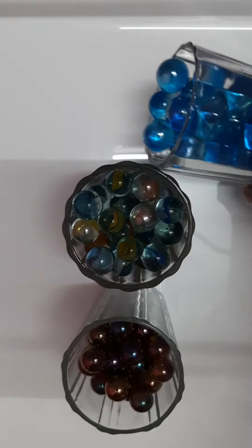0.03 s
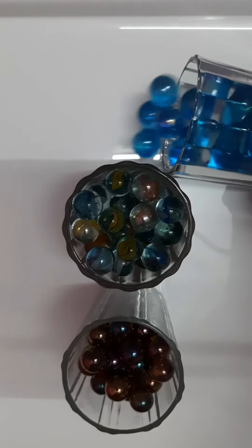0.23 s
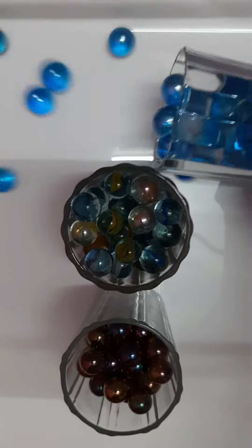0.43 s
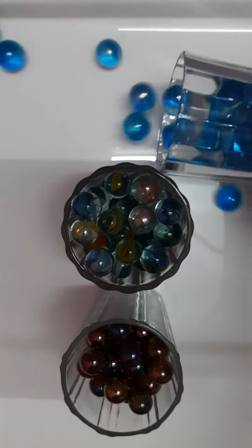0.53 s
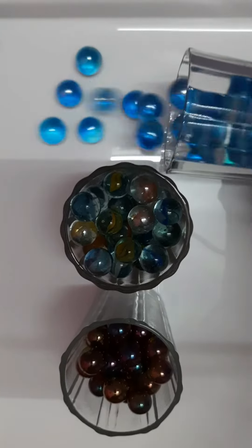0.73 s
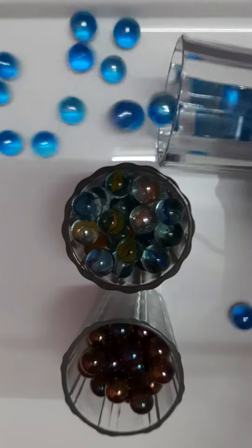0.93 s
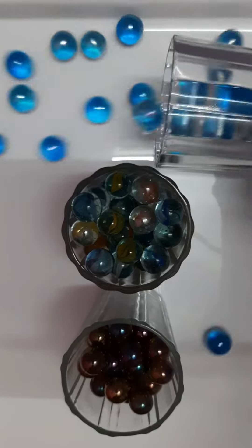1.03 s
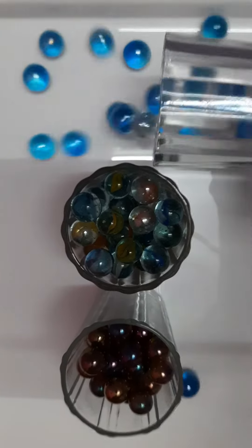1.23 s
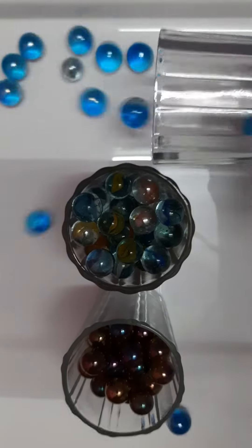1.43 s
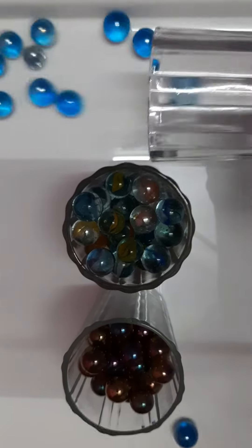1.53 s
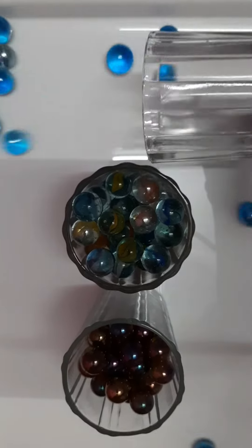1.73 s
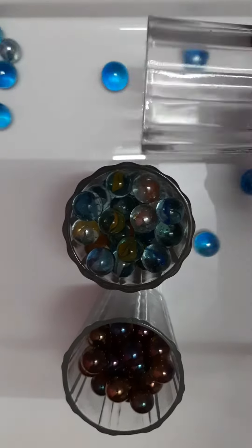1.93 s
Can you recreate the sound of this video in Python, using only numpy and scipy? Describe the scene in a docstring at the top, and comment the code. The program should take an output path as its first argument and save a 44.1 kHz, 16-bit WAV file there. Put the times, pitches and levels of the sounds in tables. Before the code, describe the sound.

Glass marbles pour from a tilted drinking glass onto a hard table. They clink against the glass, land in a quick run of clacks, then roll with a low rumble as the hits thin out. Heard close in a small room.

```python
"""A low rumble and a soft knock, then glass marbles pour from a tilted drinking glass onto a hard table.
Heard close, in a small room, they tick against each other, clink on the glass, bounce and roll away.
The glass rings briefly, damped by the marbles still inside, and bumps down once as the load shifts.
Each landing clacks and sets the table top drumming; rolling over tiny bumps makes it rumble."""
import sys
import numpy as np
from scipy import signal
from scipy.fft import rfft, irfft
from scipy.io import wavfile

SR = 44100
rng = np.random.default_rng(int(sys.argv[2]) if len(sys.argv) > 2 else 0)


def transcribe(signal):
    """Save signal, clipped to [-1, 1], as a 16-bit WAV file at the path in sys.argv[1]."""
    frames = np.atleast_2d(signal).T
    limited = np.clip(frames, -1, 1)
    pcm = np.round(limited * 32767).astype(np.int16)
    wavfile.write(sys.argv[1], SR, pcm)


N = 88200

# Rumble of rolling marbles. Each row: time in seconds, level in dB.
ROLL_ENVELOPE = [(0,-30.5),(0.059,-44.5),(.14,-54),(0.262,-45.5),(0.299,-21),(.4,-41),(.49,-45),(0.602,-27),(.7,-38),(.9,-25),(1.3,-35),(1.55,-28.5),(1.64,-39.5),(1.83,-44.5),(1.93,-54),(2,-38.5)]
# Landings on the table. Each row: start in seconds, level in dB, extra treble in dB, extra drumming in dB.
LANDINGS = [(0.0139,-32,-3,21.5),(.165,-30.5,-7,5.5),(.273,-19,-6,7.5),(0.2842,-18,6,-4),(0.2908,-11,-23,-2),(0.299,-20.5,2,3),(.3255,-8.5,-2,-16),(.3408,-7,0,0),(.3694,-6.5,-1.5,1.5),(.382,-12,4.5,-6),(.387,-7.5,-2.5,-8),
            (0.529,-19,2,6.5),(0.5879,-9.5,0,-2),(0.6398,-14,-4,-8),(.667,-4,0.5,-6),(0.7448,-8.5,-1,-1),(0.782,-13,8,-13),(0.7924,-8.5,-1.5,-11.5),(.803,-28,-10,-13),(0.8291,-8.5,-1,-10),(.844,-9.5,-12,-14),(0.8632,-14,2.5,11.5),(0.8758,-7.5,1.5,-1),
            (0.9329,-6,-2,-5),(0.9498,-17.5,5.5,-0.5),(0.961,-11.5,1,-4),(1.0521,-14.5,-3,1),(1.072,-15.5,5.5,0),(1.1199,-10,-0.5,0.5),(1.1782,-5,0,-4.5),(1.209,-16.5,9,8),(1.2443,-7,-0.5,-2.5),(1.2646,-14.5,7,5),(1.2929,-6.5,-1,0),
            (1.305,-19,-15,7),(1.3131,-28.5,20.5,-1),(1.319,-16,6,2),(1.3507,-12.5,3,3.5),(1.373,-10.5,2,5),(1.4286,-9.5,2.5,-4),(1.5004,-12,7.5,5.5),(1.644,-24,-6,-3),(1.6623,-7.5,2,2.5),
            (1.806,-34,10.5,1),(1.8298,-26.5,-22,4),(1.866,-30.5,-18,13.5),(1.9658,-24.5,-16,-3),(1.981,-32,-12,-11)]
# Table top resonances. Each row: frequency in Hz, gain in dB, T60 in seconds.
TABLE_MODES = [(240,-25,.2),(262,-27,.09),(358,-22,.11),(456,-27,.09),(713,-26,.05),(955,-24,.06),(1050,-22,.07),(1126,-22,.08),(1190,-23,.07),(1380,-30,.05),(1599,-30,.06),(1758,-32,.05),(2400,-25,.012),(3750,-24,.012),(4200,-23,.012)]
# Marble on marble. Each row: start in seconds, level in dB.
MARBLE_HITS = [(0.099,-45),(.198,-46),(0.2143,-40),(.271,-21.5),(.6995,-28),(.736,-18),(1.107,-25.5),(1.62,-33),(1.7642,-38.5),(1.7675,-39),(1.802,-42),(1.853,-58),(1.92,-51),(1.934,-45.5)]
# Marble on drinking glass. Each row: start in seconds, contact level in dB, five mode levels in dB.
GLASS_HITS = [(0.222,-28,-37,-31,-38,-55,-50),(0.2329,-19,-22,-31,-29,-43,-32),(0.242,-13.5,-24,-22,-28,-35,-21),(.256,-30,-45,-29,-44,-45,-29),(0.2722,-8,-20,-14.5,-22,-36,-18),(0.3006,-20,-22,-46,-47,-45,-49),(0.3138,-17,-24.5,-27.5,-24,-24,-33),(0.346,-22,-53,-40,-60,-35,-26),
              (.414,-14,-26.5,-21.5,-27.5,-37,-30),(0.4342,-18,-34,-24,-43,-48,-35),(0.5211,-15,-23,-18.5,-31,-29,-29),(0.5446,-6,-24.5,-16.5,-22.5,-26,-17.5),(0.552,-28,-23,-19,-54,-63,-16),(0.5716,-29,-40,-23,-43,-45,-44),
              (0.699,-17,-28,-16.5,-23,-31,-20.5),(0.7234,-27,-34,-41,-36,-18,-25),(.7352,-17,-19,-33,-22,-22,-29),(0.7519,-16,-17,-17,-24,-18,-18.5),(0.771,-12,-16,-29,-22.5,-21,-32),(0.8003,-15,-16,-17.5,-30,-17.5,-31),(0.8201,-5,-20,-25,-29,-38,-27),
              (0.8932,-19,-38,-23,-33,-39,-35),(1.0166,-5,-19,-25,-13.5,-21,-22.5),(1.0402,-21,-25,-22.5,-23,-23,-30),(1.109,-22,-42,-28,-25,-25,-37),(1.1505,-11,-32,-30,-14,-18,-32),(1.1832,-19,-49,-41,-15,-19,-37),(1.2048,-15,-24.5,-28,-23.5,-23,-35),(1.5924,-35,-35,-37,-47,-47,-41)]
# Drinking glass resonances. Each row: frequency in Hz, gain in dB, T60 in seconds, right lag in radians.
GLASS_MODES = [(2961,-5.5,.13,1.4),(7158,-2.5,.075,1.6),(9096,.5,.075,1.5),(11827,-3,.075,1.6),(12702,2,.08,1.6)]
# Spectra of the sources and the room tail. Each row: frequency in Hz, gain in dB.
ROLL_SPECTRUM = [(25,-34),(70,-13),(150,-13.5),(205,-1.5),(240,9.5),(290,-7),(370,-3),(600,-8.5),(1150,-6.5),(1600,-5.5),(2500,-5.5),(5000,-19),(11000,-22.5),(16000,-34)]
HUM_SPECTRUM = [(20,-24),(60,5),(100,11.5),(170,-2.5),(600,-7),(3000,-52),(16000,-45)]
CLACK_SPECTRUM = [(40,-23),(140,-43.5),(280,1),(430,-1),(600,-6),(950,5),(1350,6.5),(1900,-1.5),(2600,-5),(3400,-5.5),(5500,-8.5),(9000,-8.5),(12500,-13),(15500,-27)]
TICK_SPECTRUM = [(100,-30),(1500,4),(4000,11),(8000,6),(12000,-1),(15500,-1)]
ROOM_SPECTRUM = [(60,-9),(250,2),(600,0),(1200,-1),(2500,8),(5000,1.5),(9000,2),(15000,-5)]
# Room decay. Each row: frequency in Hz, T60 in seconds.
ROOM_DECAY = [(150,0.16),(400,0.48),(1000,0.41),(3000,0.21),(7000,0.36),(15000,0.32)]

MONO_HZ = 486
RING_TIME_S = np.arange(int(.3 * SR)) / SR


def amp(db):
    """dB to gain."""
    return 10 ** (np.asarray(db) / 20)


def unit_rms(x):
    """Scales to rms 1."""
    return x / np.sqrt(np.mean(x ** 2) + 1e-20)


def interp_log_hz(points, hz):
    """Reads a table on a log-frequency axis."""
    point_hz, value = np.transpose(points)
    return np.interp(np.log(hz + 1), np.log(point_hz + 1), value)


def add(mix, start_s, sound):
    """Adds a sound to a stereo mix."""
    part = mix[:, max(round(start_s * SR), 0):][:, :sound.shape[-1]]
    part += sound[..., :part.shape[1]]


def colour(x, spectrum, size=2048):
    """Minimum-phase filter with the given spectrum."""
    hz = abs(np.fft.fftfreq(size, 1 / SR))
    log_gain = np.log(amp(interp_log_hz(spectrum, hz)))
    taps = np.fft.ifft(np.exp(np.conj(signal.hilbert(log_gain)))).real
    return signal.oaconvolve(x, taps[None], axes=1)[:, :x.shape[1]]


def bass_weight(hz):
    """1 in the bass, falling to 0 above MONO_HZ."""
    return 1 / (1 + (hz / MONO_HZ) ** 4)


def mono_bass(x):
    """Makes the bass alike in both channels."""
    left, right = rfft(x)
    common = bass_weight(np.fft.rfftfreq(x.shape[1], 1 / SR))
    right = common * left + np.sqrt(1 - common ** 2) * right
    return irfft(np.array([left, right]), x.shape[1])


def impact(noise, scatter_s, scatter_db, right_lag_s=.00011):
    """Sharp contact, heard first on the left, then a few milliseconds of scattered echoes."""
    t = RING_TIME_S[:noise.shape[1]]
    echoes = unit_rms(mono_bass(noise) * np.exp(-t / scatter_s) * np.sqrt(t))
    out = amp(scatter_db) * echoes / np.sqrt(len(t))
    out[0, 0] -= 1
    out[1, round(right_lag_s * SR)] -= 1
    return out


def rolling(bumps_per_s=3500, uneven_db=4.0):
    """Marbles patter over tiny bumps and shake the table."""
    hits = rng.random(N) < bumps_per_s / SR
    strength = amp(uneven_db * np.minimum(rng.exponential(1, N), 4))
    bumps = mono_bass(hits * strength * rng.standard_normal((2, N)))
    level_db = np.interp(np.arange(N) / SR, *np.transpose(ROLL_ENVELOPE))
    return amp(level_db) * unit_rms(colour(bumps, ROLL_SPECTRUM))


def hum(level_db=-51.5):
    """Faint, steady low background noise."""
    return amp(level_db) * unit_rms(colour(rng.standard_normal((2, N)), HUM_SPECTRUM))


def knocks(clack_gain_db=12.5, drum_gain_db=3.5, spread_db=4, treble_hz=2810, share=.12, size=1024):
    """Each landing clacks; the blow spreads through the table top and rings its modes."""
    clack, drum = np.zeros((2, 2, N))
    hz, gain_db, t60_s = np.transpose(TABLE_MODES)[:, :, None]
    modes = amp(gain_db - 60 * RING_TIME_S / t60_s) * np.exp(2j * np.pi * hz * RING_TIME_S)
    bass = bass_weight(hz[:, 0])
    highpass = signal.butter(1, treble_hz, "high", fs=SR)
    shared = rng.standard_normal((2, size))  # nearby spots share part of their echoes
    phase_spread_rad = np.minimum(hz.T / MONO_HZ, 2) ** 2 / 3
    stereo_phase = np.exp(1j * phase_spread_rad * rng.standard_normal((2, len(hz))))
    for start_s, level_db, treble_db, bass_db in LANDINGS:
        noise = np.sqrt(share) * shared + np.sqrt(1 - share) * rng.standard_normal((2, size))
        blow = impact(noise, scatter_s=.0013, scatter_db=9.5)
        treble = signal.lfilter(*highpass, blow)
        add(clack, start_s, amp(level_db) * (blow + (amp(treble_db) - 1) * treble))
        spot_db = spread_db * rng.standard_normal(len(hz))  # mode levels vary with the spot
        weights = amp(level_db + bass_db * bass + spot_db) * stereo_phase
        add(drum, start_s, -(weights @ modes).real)
    return amp(clack_gain_db) * colour(clack, CLACK_SPECTRUM) + amp(drum_gain_db) * drum


def ticks(gain_db=21, wall_gain_db=-17, size=1024):
    """Bright glass-on-glass contact: marble on marble, and the onset of each clink."""
    out = np.zeros((2, N))
    wall_hits = [(start_s, contact_db + wall_gain_db) for start_s, contact_db, *_ in GLASS_HITS]
    for start_s, level_db in MARBLE_HITS + wall_hits:
        contact = impact(rng.standard_normal((2, size)), scatter_s=.00082, scatter_db=-5)
        add(out, start_s, amp(level_db) * contact)
    return amp(gain_db) * colour(out, TICK_SPECTRUM)


def clinks(gain_db=5, rise_s=.0012, split_hz=14, roughness=.5, chatter_hz=160, chatter_s=.047):
    """The glass wall rings in close mode pairs, rough at first while the marble chatters against it."""
    out = np.zeros((2, N))
    hz, mode_db, t60_s, lag_rad = np.transpose(GLASS_MODES)[:, :, None]
    t = RING_TIME_S[:len(RING_TIME_S) // 2]
    envelope = amp(mode_db - 60 * t / t60_s) * (1 - np.exp(-t / rise_s))
    modes = envelope * np.exp(2j * np.pi * hz * t)
    stereo_phase = np.exp(-1j * np.array([0 * lag_rad, lag_rad]))
    lowpass = signal.butter(2, chatter_hz, fs=SR)
    for start_s, _, *levels_db in GLASS_HITS:
        detune_hz = split_hz * rng.standard_normal((len(hz), 1))
        phase = np.exp(2j * np.pi * rng.random((3, len(hz), 1)))
        twin = .33 * phase[1:] * np.exp(2j * np.pi * detune_hz * t)
        pairs = modes * phase[0] * (stereo_phase + twin)
        ring = (amp(levels_db)[:, None] * pairs).sum(1)
        jitter = unit_rms(signal.lfilter(*lowpass, rng.standard_normal((2, len(t)))))
        chatter = 1 + roughness * (jitter[0] + 1j * jitter[1]) * np.exp(-t / chatter_s)
        add(out, start_s, (ring * chatter).real)
    return amp(gain_db) * out


def thud(start_s=.271, hz=90, t60_s=.062, level_db=-30):
    """The glass bumps softly on the table as its load shifts."""
    out = np.zeros((2, N))
    envelope = amp(level_db - 60 * RING_TIME_S / t60_s)
    add(out, start_s, envelope * np.sin(2 * np.pi * hz * RING_TIME_S))
    return out


def room(x, rise_s=.0013, size=256):
    """Dense tail from near, hard walls; each band decays at its own rate."""
    noise = mono_bass(rng.standard_normal((2, SR // 2)))
    hz, t, bands = signal.stft(noise, SR, nperseg=size)
    t60_s = interp_log_hz(ROOM_DECAY, hz)[:, None]
    _, tail = signal.istft(bands * amp(-60 * t / t60_s), SR, nperseg=size)
    tail *= 1 - np.exp(-np.arange(tail.shape[1]) / SR / rise_s)
    response = colour(tail / np.linalg.norm(tail[0]), ROOM_SPECTRUM)
    return signal.fftconvolve(x, response, axes=1)[:, :N]


def scene(table_send_db=-4.5, glass_send_db=-8):
    """Table and glass sounds with room tail, over dry rolling and hum."""
    table = knocks() + thud()
    glass = clinks() + ticks()
    background = hum()
    reverb = room(amp(table_send_db) * table + amp(glass_send_db) * glass)
    return table + glass + reverb + rolling() + background


def record(dry, limit=.97, cutoff_hz=15900):
    """Soft peak limit, then low-pass."""
    limited = dry / (1 + (dry / limit) ** 4) ** .25
    lowpass = signal.firwin(255, cutoff_hz, window=("kaiser", 9), fs=SR)
    return signal.oaconvolve(limited, lowpass[None], "same")


dry = scene()
out = record(dry)
transcribe(out)
```